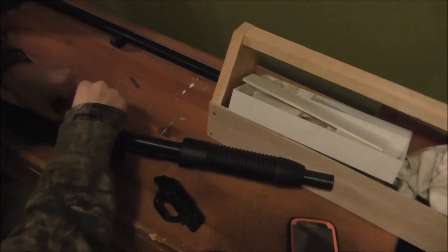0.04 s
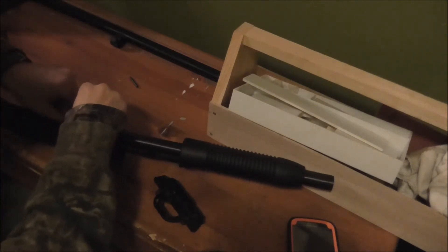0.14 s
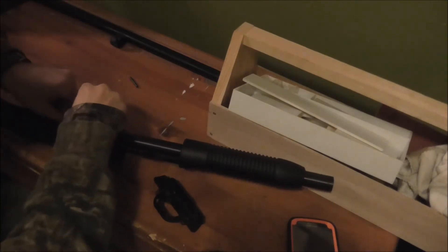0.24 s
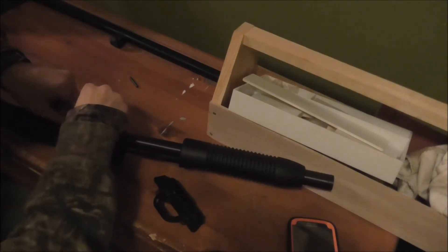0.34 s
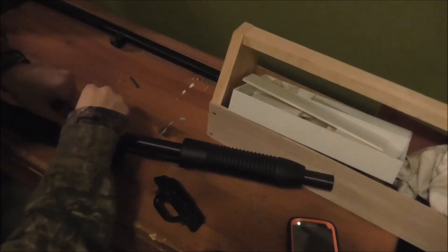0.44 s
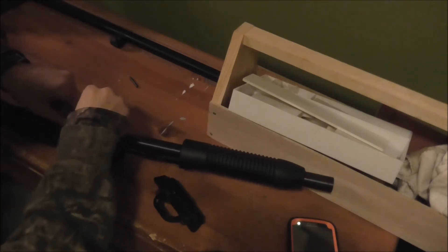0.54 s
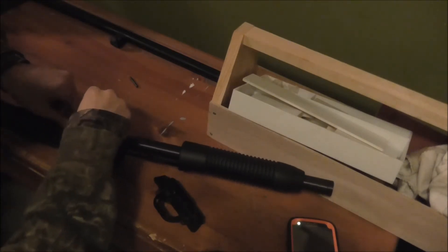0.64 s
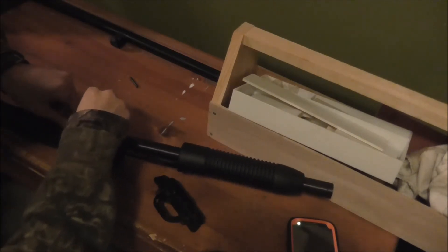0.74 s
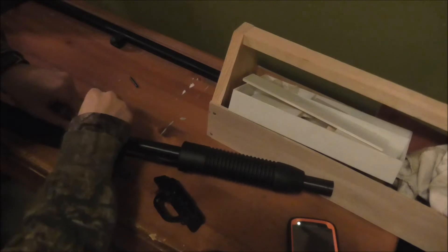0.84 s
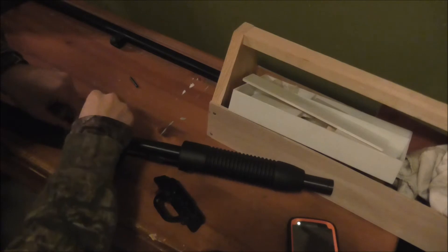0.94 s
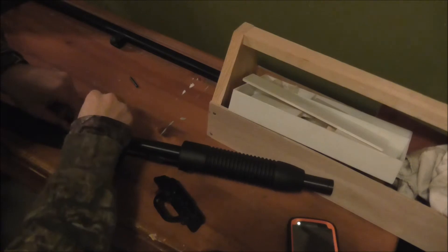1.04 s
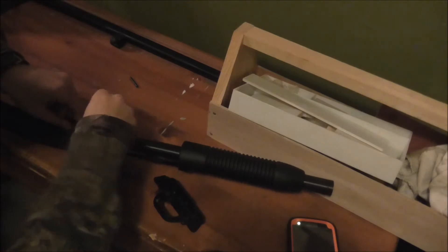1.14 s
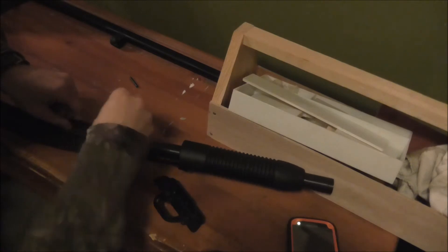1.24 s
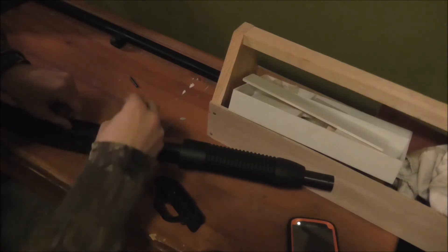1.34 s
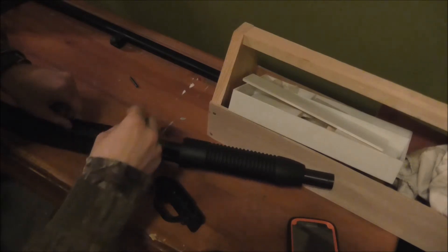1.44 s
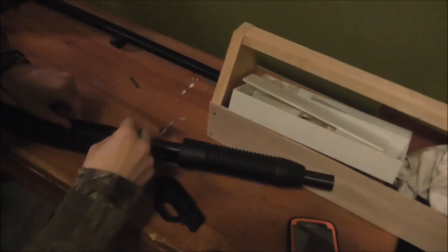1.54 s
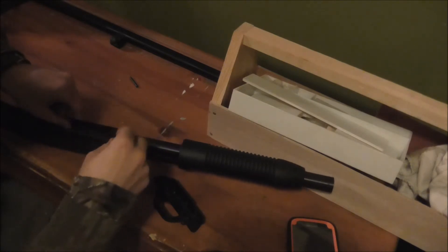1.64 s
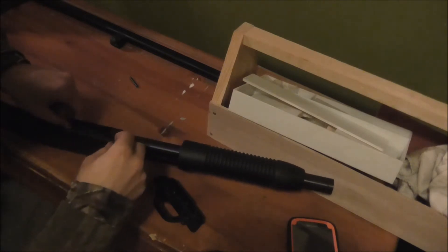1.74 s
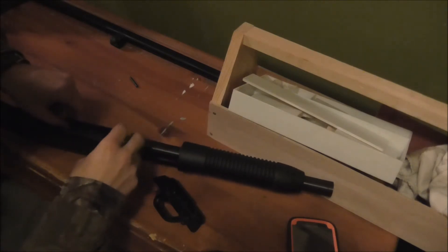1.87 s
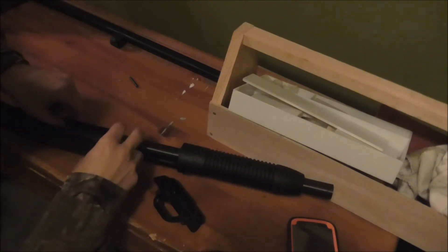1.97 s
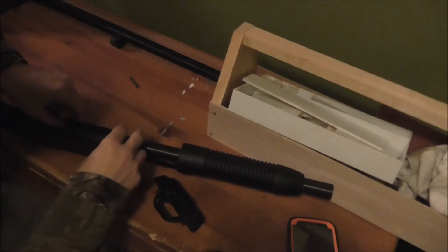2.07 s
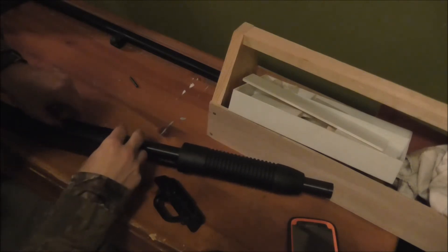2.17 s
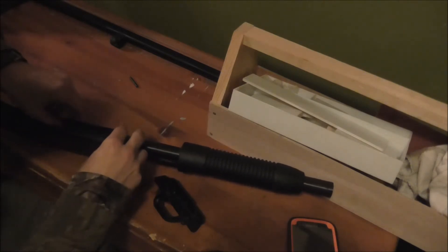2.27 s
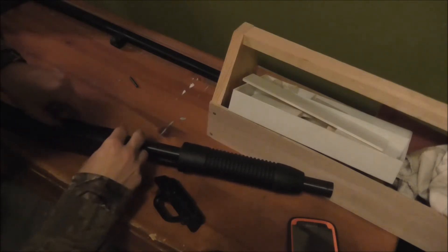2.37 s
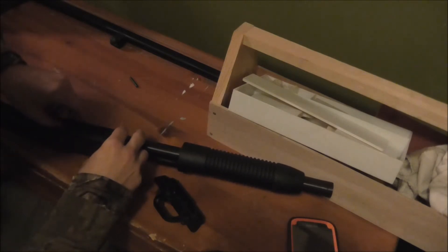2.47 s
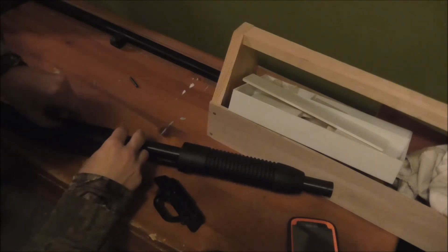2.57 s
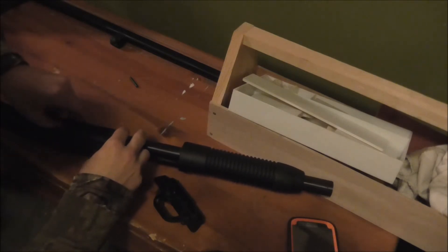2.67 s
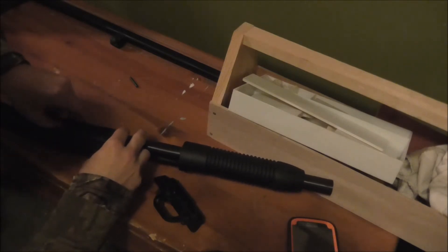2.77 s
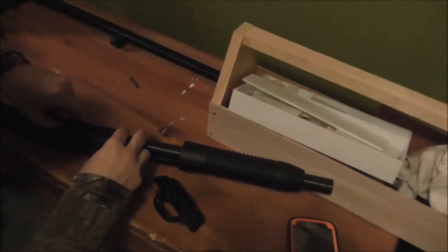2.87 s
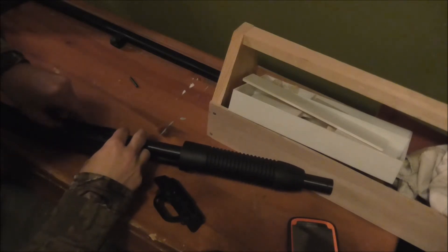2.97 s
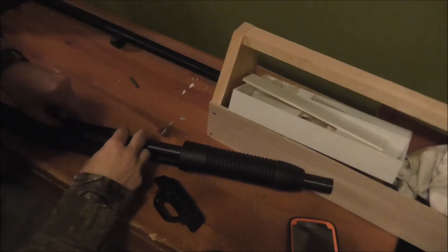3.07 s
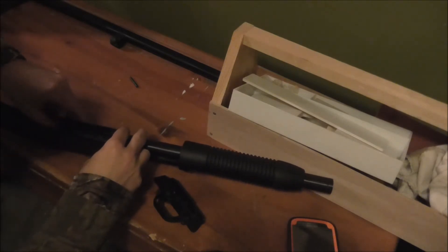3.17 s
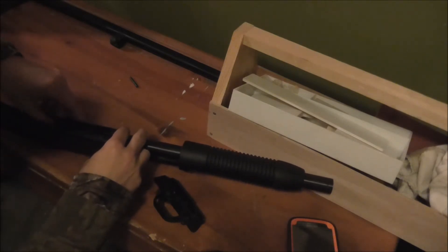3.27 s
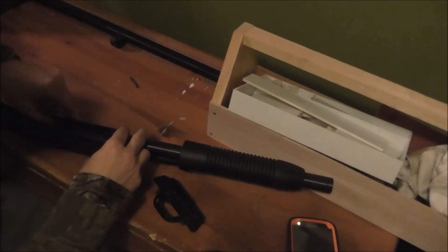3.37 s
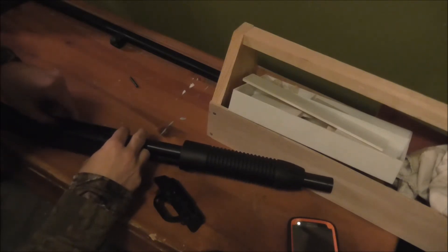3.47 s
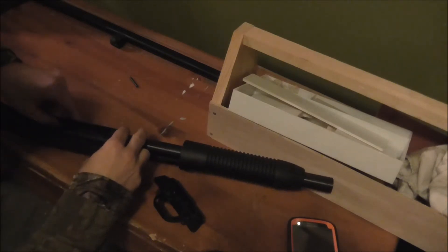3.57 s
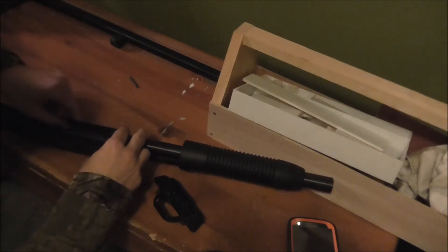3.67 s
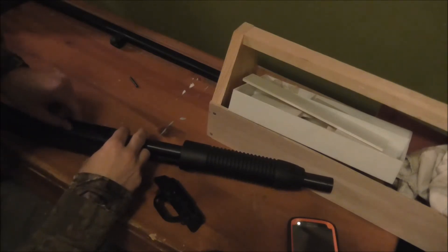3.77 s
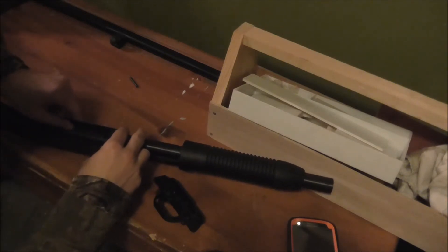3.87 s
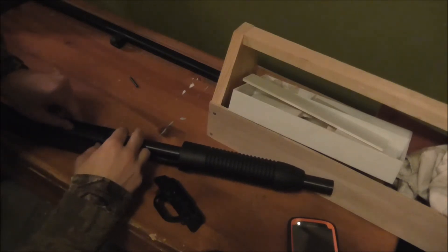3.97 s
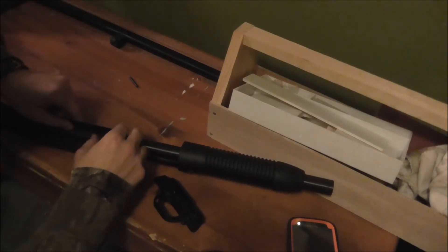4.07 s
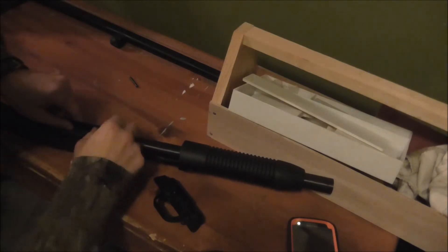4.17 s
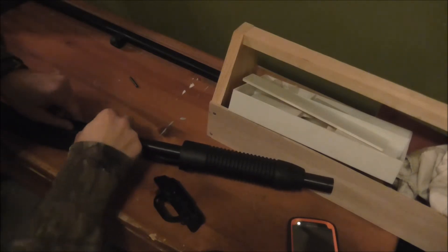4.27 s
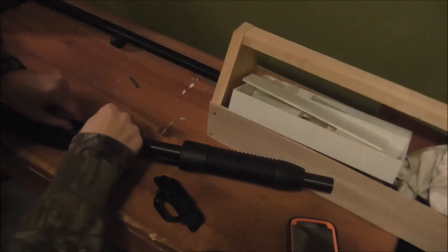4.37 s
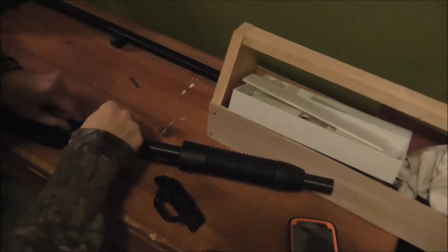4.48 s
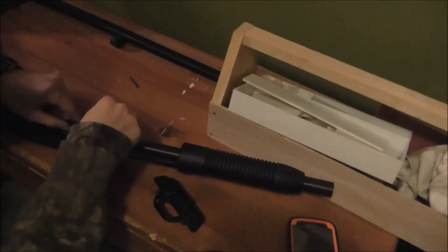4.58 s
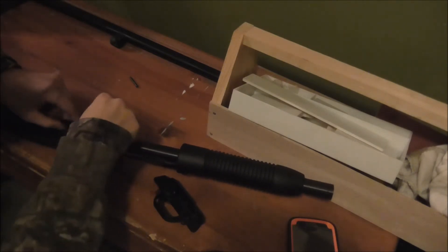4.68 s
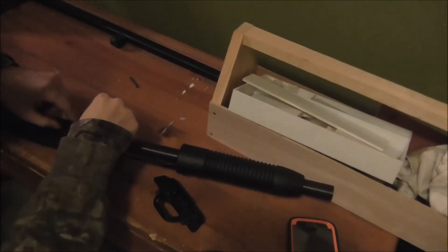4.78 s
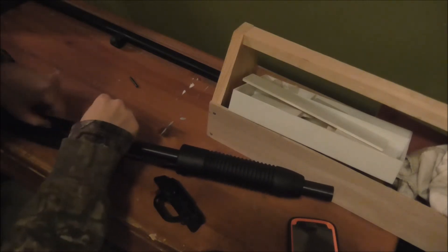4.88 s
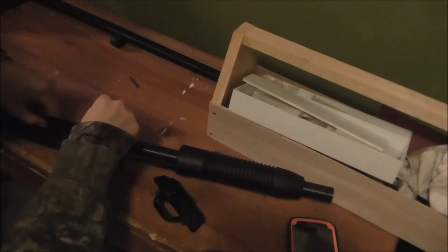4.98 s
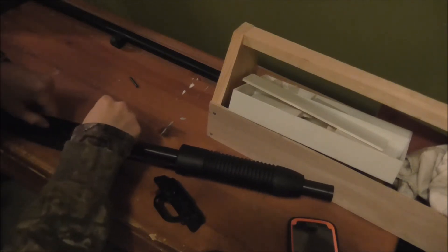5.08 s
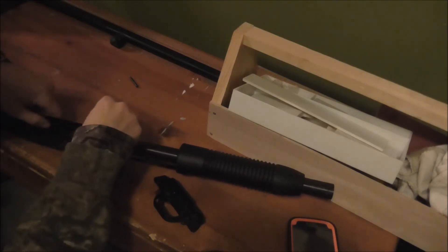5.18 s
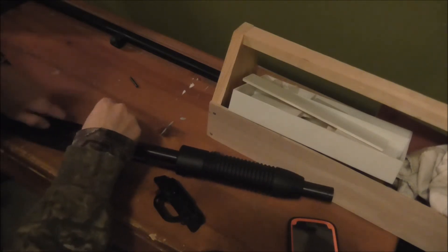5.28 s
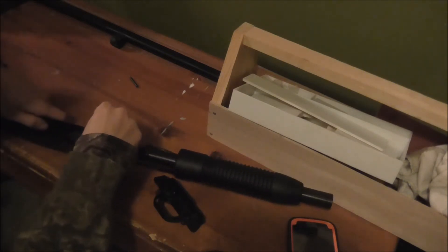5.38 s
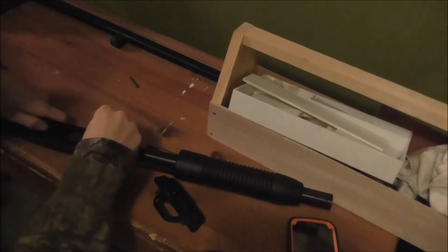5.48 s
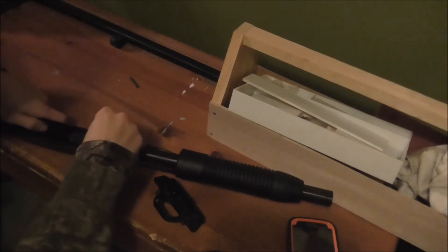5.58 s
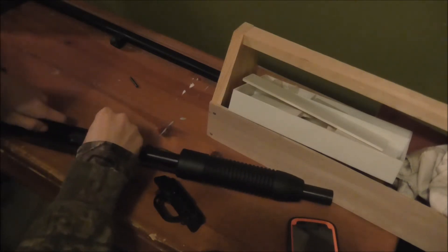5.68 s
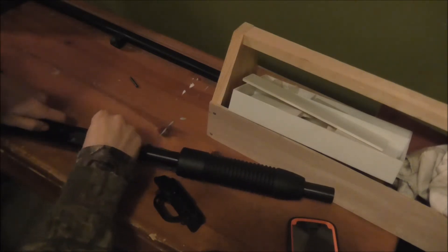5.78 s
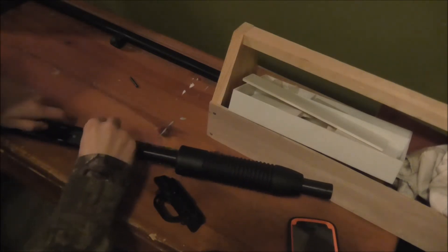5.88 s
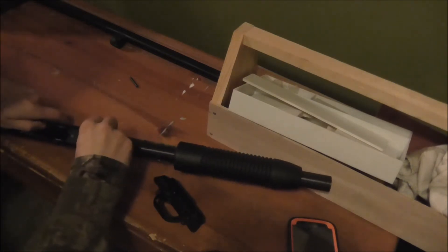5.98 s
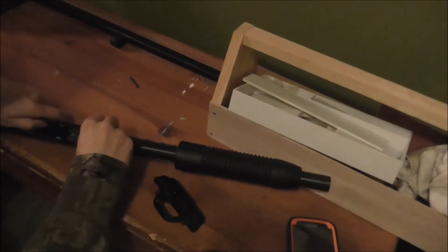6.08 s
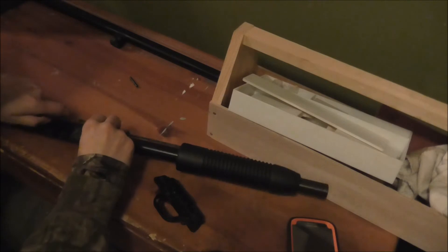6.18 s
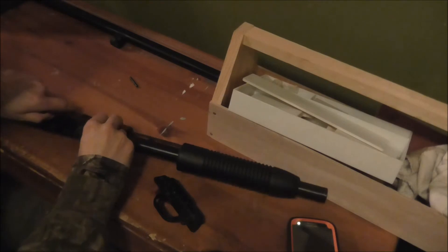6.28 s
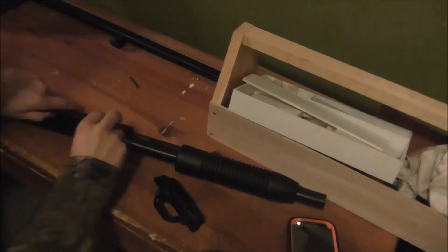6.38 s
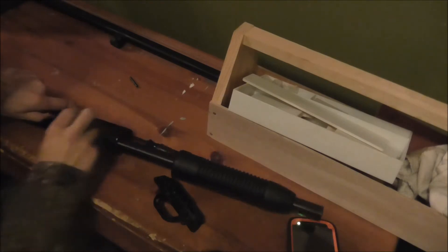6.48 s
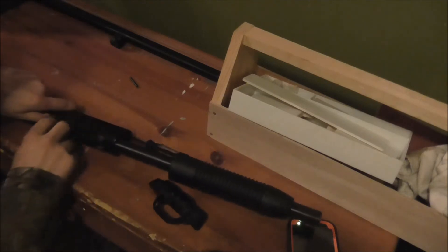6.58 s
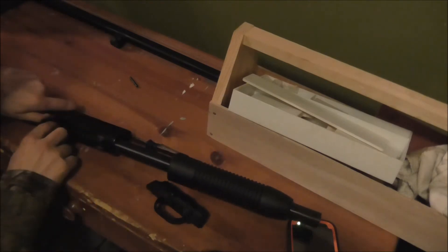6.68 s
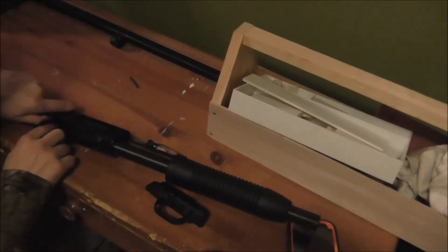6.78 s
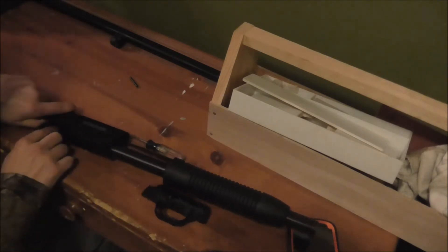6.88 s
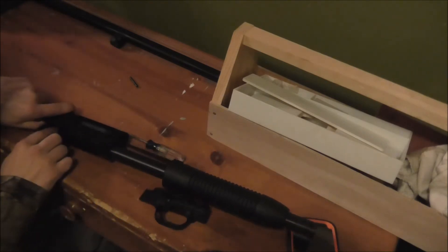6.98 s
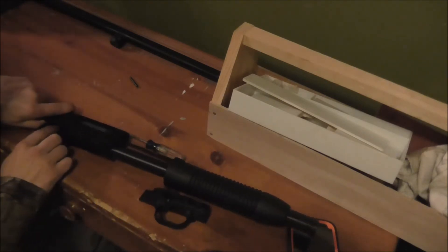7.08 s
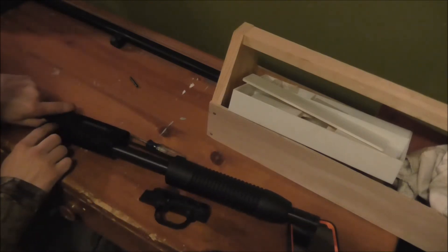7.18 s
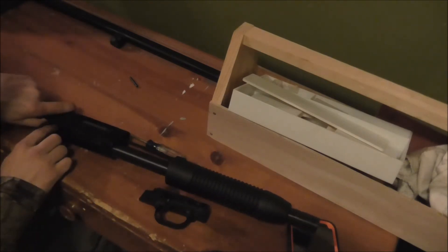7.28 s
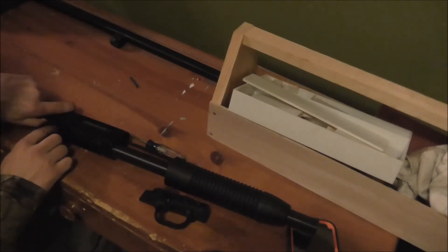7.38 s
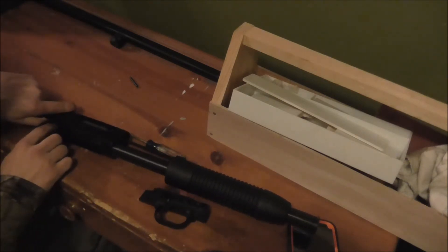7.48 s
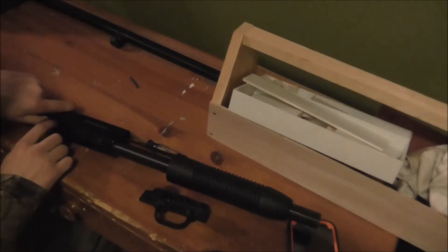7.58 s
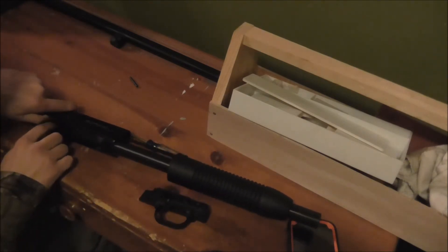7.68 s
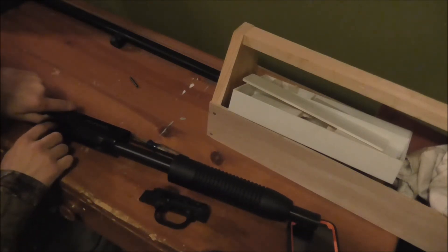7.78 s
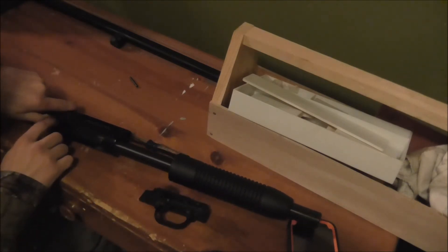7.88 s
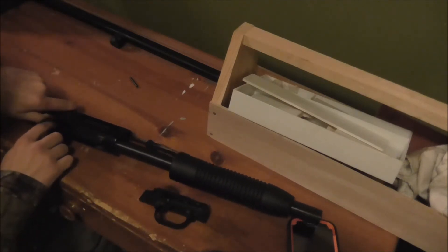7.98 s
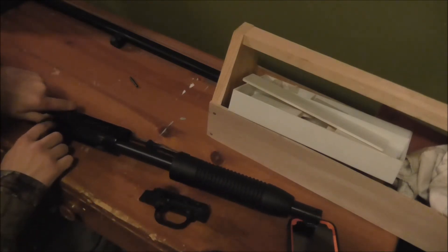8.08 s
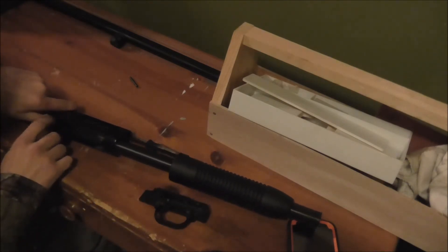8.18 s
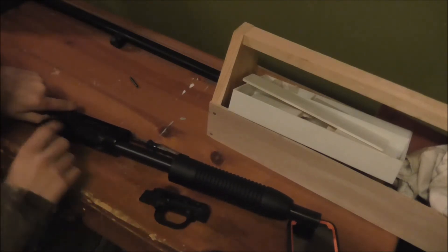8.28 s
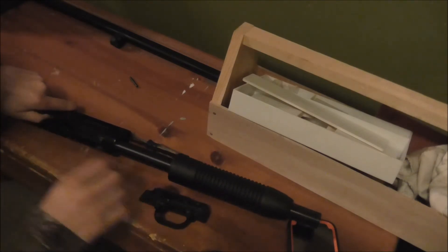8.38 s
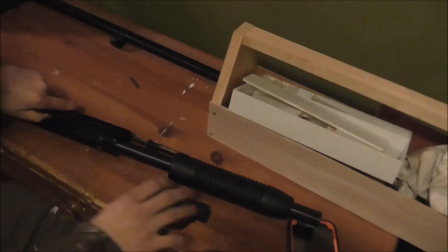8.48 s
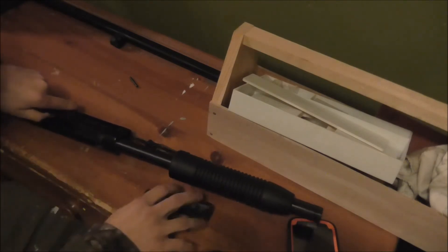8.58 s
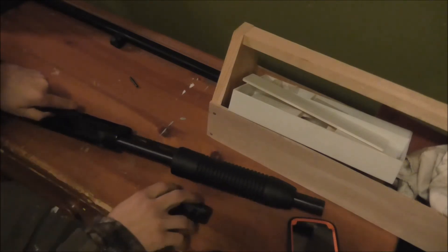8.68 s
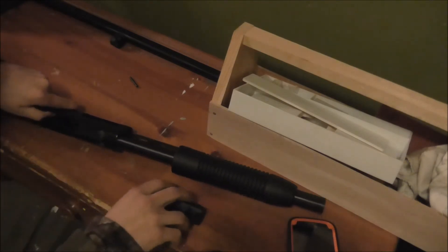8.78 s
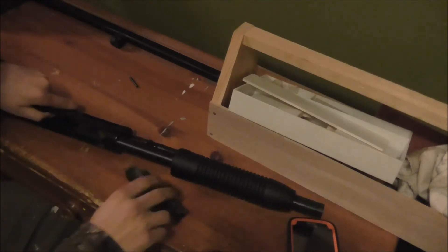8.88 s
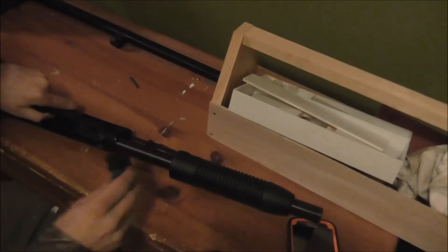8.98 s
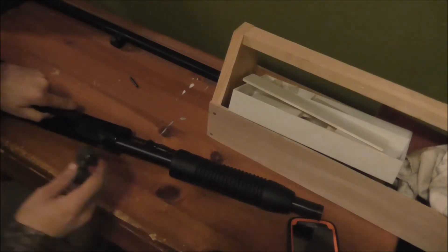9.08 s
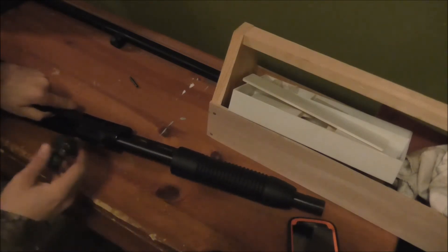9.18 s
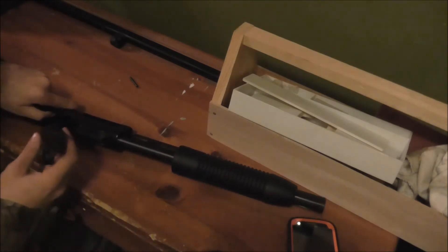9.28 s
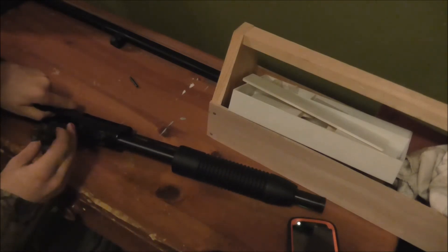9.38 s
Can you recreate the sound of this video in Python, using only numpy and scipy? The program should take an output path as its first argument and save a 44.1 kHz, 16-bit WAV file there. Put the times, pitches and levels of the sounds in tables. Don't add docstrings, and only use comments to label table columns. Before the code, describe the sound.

Close metallic clacks and dull wooden knocks from a long gun being assembled, then turned over in a clatter, over faint hum and hiss.

```python
import sys
import numpy as np
from scipy import signal
from scipy.fft import rfft, irfft
from scipy.io import wavfile
from scipy.ndimage import uniform_filter1d

SR = 44100
rng = np.random.default_rng(int(sys.argv[2]) if len(sys.argv) > 2 else 0)


def master(y):
    cut = np.clip(np.atleast_2d(y).T, -1, 1)
    pcm = np.round(cut * 32767)
    wavfile.write(sys.argv[1], SR, pcm.astype(np.int16))


def level_to_linear(level):
    exponent = np.asarray(level, float) / 20
    return 10 ** exponent


N = 415863

# f/Hz, level/dB [dB per Hz]
CLACK_TAIL = [(530, -41), (900, -32), (1400, 1.5), (1630, -0.5), (1880, -15), (2170, -12.5), (3340, -18.5),
              (3800, -13), (4660, -18.5), (5910, -6.5), (8340, -23), (10200, -16), (15500, -46)]
# f/Hz, level/dB [dB per Hz]
WASH = [(12, -65), (30, -20), (48, -3), (80, -20), (110, -8.5), (166, -13), (252, -5.5), (352, -13.5),
        (427, -11), (491, -11.5), (857, -14.5), (985, -18.5), (1580, -22), (2680, -31.5), (13100, -37.5),
        (15500, -39.5)]
# f/Hz, likeness [-1 to 1]
SIDE_LIKENESS = [(60, 0.072), (240, 0.84), (950, 0.24), (3770, 0.055), (15000, 0.46)]
# t/s, level/dB
HUM_LEVEL = [(0, -66), (.5, -60), (1.2, -58), (1.7, -54), (3.2, -55), (4.2, -59), (5.3, -56), (6, -58),
             (7.5, -58), (8.6, -58), (9.43, -57)]
# f/Hz, level/dB
HUM_TONES = [(63.5, 1.5), (127, -8), (133, -7), (200, -8), (260, -14), (437, -11)]

# f/Hz, level/dB, time to fall 60 dB [s]
STEEL_EARLY = [(1580, -20, 0.0093), (1560, 4.5, 0.019), (1920, -4, 0.0072), (2810, -16, 0.019),
               (3660, -1, 0.0057), (4560, -4.5, 0.0081), (5420, -7.5, 0.01), (6190, -9, 0.017),
               (7300, 1, 0.006), (9140, 4.5, 0.012), (10100, -3, 0.0045), (11550, -14, 0.0043)]
# f/Hz, level/dB, time to fall 60 dB [s]
STEEL_LATE = [(1693, 10.5, 0.023), (1811, 3, 0.065), (1496, 0, 0.022), (1292, -0.5, 0.018),
              (2360, -14, 0.025), (3170, -23, 0.047), (4070, -8, 0.0071), (4350, -5, 0.016),
              (5300, -10, 0.015), (6320, 1, 0.0043), (6980, -9, .012), (8920, 12.5, 0.044),
              (10140, 11.5, 0.0091), (11600, 11, 0.005)]
# f/Hz, level/dB, time to fall 60 dB [s]
STEEL_JOLT = [(1650, 1, 0.024), (1820, 4, 0.018), (2630, 13, 0.013), (4680, 7.5, 0.023), (5100, 5, 0.011),
              (5650, 13, 0.0085), (9600, 8, 0.0022), (11780, -12, 0.014)]
# from f/Hz, to f/Hz, time to fall 60 dB [s], level/dB re strong rings
FIZZ_FAMILIES = [
    (1210, 2440, 0.074, 1),
    (2600, 6400, 0.027, 1.5),
    (7900, 14600, 0.006, 2),
]
# t/s, middle level/dB, hollow level/dB re middle
TOUCHES_EARLY = [(0.2134, -65, 21.5), (0.2336, -51, 9.5), (0.3515, -42, 10), (0.4741, -45.5, 11),
                 (0.672, -53, 7), (0.6857, -48, 2), (0.707, -44, 1), (0.932, -55, 11), (0.952, -36, 3),
                 (0.969, -43, -5), (1.0, -44, 5), (1.54, -44, 2), (2.0562, -55, -5), (3.1825, -55.5, 14.5),
                 (3.2446, -38, 2), (3.5478, -46, 11), (3.8853, -43.5, 7), (4.4858, -49.5, 5),
                 (4.9987, -55, -12), (5.288, -52, -6), (5.3566, -53, -3), (5.4426, -48.5, 8),
                 (5.481, -33.5, 4)]
# t/s, middle level/dB, hollow level/dB re middle
TOUCHES_LATE = [(5.8806, -46, 5), (5.993, -49, 15), (6.009, -51, 13), (6.2403, -52, 13), (6.331, -34, 4),
                (6.0307, -51, -17), (6.5336, -43, 12), (6.6155, -33.5, 1), (6.7037, -46, -1),
                (7.0187, -31.5, 4), (7.0587, -36, 2), (7.1679, -57.5, 22), (7.606, -42, 4),
                (7.9579, -36, 7.5), (8.068, -24, 2), (8.25, -38, 10.5), (8.33, -30, -17),
                (8.6255, -40.5, 2.5), (8.72, -58, 6), (8.737, -46, -2), (8.9164, -57, 7),
                (8.9381, -35, -13), (8.9876, -35, 10)]
# t/s, middle level/dB, hollow level/dB re middle, edge level/dB re middle, strongest f/Hz
CLACKS_EARLY = [(0.719, -21.5, 1, -10, 3650), (0.9428, -34, -2, -7, 2860), (0.9614, -28, 0, -12, 5170),
                (0.976, -23.5, 1, -15, 2880), (0.9827, -13.5, -1, 3, 2750), (1.0643, -28.5, -2, 1, 5380),
                (1.0689, -18.5, -5.5, 2, 2730), (2.0981, -38.5, -4.5, -9, 4250),
                (3.256, -32, -4, -29, 3340), (3.2633, -31, -1, -2, 5000), (3.2803, -28, -6, -12, 2630),
                (3.377, -20, -4, -30, 4400), (3.382, -15.5, -6.5, -4.5, 4400), (3.7474, -32, 1, -10, 6000),
                (3.947, -13.5, -10, 6, 5100), (4.7011, -30.5, 1.5, -13, 2600)]
# t/s, middle level/dB, hollow level/dB re middle, edge level/dB re middle
CLACKS_LATE = [(6.002, -45.5, 10, 8.5), (6.288, -13, -10, -8.5), (6.3023, -16.5, -2, -5),
               (6.317, -20, 3.5, -13), (6.8157, -28.5, -1.5, -3), (6.823, -27, 2, -10),
               (6.8309, -29, 13, -15), (6.8364, -24.5, 8, -19), (6.906, -23, 3.5, -3),
               (7.22, -35.5, 0, -20), (7.233, -21, 0.5, 2.5), (7.243, -17.5, 0, -5),
               (7.3946, -28, 5.5, -34.5), (7.407, -21.5, 6.5, -19), (7.4187, -21, 3, -22),
               (7.427, -25.5, 3.5, -12), (7.503, -33.5, -27, -11), (7.623, -25, 7, 6.5),
               (7.635, -19, 4.5, -4.5), (7.7538, -19, 1, -15), (7.763, -10, -2.5, -10.5),
               (7.9809, -17.5, 2.5, 1.5), (7.991, -21.5, 2.5, -24), (8.0735, -29, -8, -5),
               (8.08, -10.5, -2.5, -9), (8.277, -17.5, -1, -3.5), (8.29, -19.5, 2, -3),
               (8.303, -28, 8, -30), (8.6456, -21, -4, -18), (8.656, -29, -5, -20)]
JOLT_RINGS = [5100, 4850, 4750, 2770]

# f/Hz, level/dB
TABLE = [(110, -1), (165, -21), (215, 0.5), (255, -2.5), (320, -0.5), (415, -6), (480, 1.5), (550, -0.5),
         (630, -7.5), (710, -12), (800, -14.5), (900, -3.5), (1120, -5.5), (1270, -4.5), (1480, -2)]
# f/Hz, level/dB
STILL_TABLE = [(150, -10), (235, -23), (315, 0.5), (385, -3), (425, -5.5), (505, 0.5), (548, 7),
               (610, -1.5), (690, -9), (770, -11.5), (835, 3), (1007, -17), (1136, 7), (1300, -12)]
# t/s, level/dB, upper modes level/dB re knock, strongest f/Hz
KNOCKS = [(0.237, -42, -22, 400), (0.981, -38.5, -5, 430), (3.383, -38.5, -5, 500), (2.109, -49, -0.5, 208),
          (3.255, -37, -9, 500), (3.862, -35.5, -25, 334), (3.87, -37, -23.5, 550), (3.9, -42, -20, 606),
          (3.911, -39, -21, 570), (4.491, -44.5, -33, 627), (5.36, -41.5, -6.5, 700), (5.427, -39, 6, 596),
          (5.481, -27, -5.5, 620), (5.495, -37.5, 2.5, 560), (6.1256, -49, 7.5, 424), (6.134, -49, 7, 500),
          (6.24, -39, -5, 600), (6.21, -33.5, -9, 500), (7.409, -41.5, 1, 494), (0.72, -50, 1, 706),
          (7.628, -51, -10, 700), (7.763, -43.5, 4, 690), (8.081, -42.5, -10, 730), (8.278, -41, -7, 702)]
# t/s, level/dB, upper modes level/dB re knock, strongest f/Hz
BUMPS = [(6.286, -14.5, -5, 418), (6.301, -11.5, -4.5, 478), (6.315, -22, -10, 330), (6.33, -17.5, -2, 507),
         (6.344, -23.5, -10, 260), (6.355, -30.5, 4, 520), (6.363, -20.5, -18, 514), (6.372, -24, -22, 250),
         (6.392, -29, -17, 218), (6.4, -27, -25, 111), (6.417, -24.5, -14, 252), (6.534, -13, -5, 505),
         (6.558, -19.5, -5, 523), (6.584, -19, -18, 540), (6.61, -14.5, -11.5, 544), (6.594, -24, -12, 325),
         (6.64, -23.5, -16, 332), (6.674, -23, -15.5, 307), (6.72, -31, -27, 320), (6.75, -27.5, -35, 325),
         (6.786, -24.5, -14, 224), (6.902, -17, -11, 490), (7.021, -15, -8.5, 358), (7.036, -30.5, -4, 300),
         (7.06, -30, -15, 428), (7.076, -24, -30, 250), (7.1, -30, -23, 260), (7.17, -19, -15.5, 485),
         (7.186, -21.5, -28, 340), (6.925, -27, -16, 300), (6.955, -30, -21, 420)]
# t/s, level/dB, upper modes level/dB re knock, strongest f/Hz
GRAB = [(8.628, -29.5, -8, 277), (8.655, -11.5, 1.5, 465), (8.664, -12, -12, 342.5), (8.679, -20, -18, 320),
        (8.72, -18.5, -6.5, 422), (8.745, -26, -8.5, 320), (8.765, -29, -16, 304), (8.807, -28, -27, 258),
        (8.836, -30.5, -13, 318), (8.864, -27.5, -14, 318), (8.914, -22.5, -18, 343),
        (8.948, -19.5, -4, 320), (8.964, -25.5, 3, 317), (8.975, -25.5, -3, 320), (8.985, -23.5, -1.5, 333),
        (9.008, -39, 3, 320)]
# t/s, level/dB, left-right level/dB
THUDS = [
    (0.349, -11.5, -1.5),
    (1.5365, -11, -2),
    (3.5431, -18.5, -1.5),
    (3.8234, -22, -1.5),
    (8.6463, -3, -1),
    (8.9391, -9.5, -1.5),
]
# f/Hz, level/dB, time to fall 60 dB [s]
SPOT_FAR = [(318, -14, 0.1), (408, -6, 0.053), (478, -7, 0.036), (562.5, 3, 0.062), (604, -4.5, 0.047),
            (836, -11, 0.075), (905, -11, 0.06), (1310, -13.5, 0.044), (2000, -16.5, 0.023)]
# f/Hz, level/dB, time to fall 60 dB [s]
SPOT_EDGE = [(250, -17, .05), (320, -15.5, 0.15), (420, 3.5, 0.048), (520, 9.5, 0.037), (642, 4, 0.046),
             (684, 5, 0.041), (765, -5, 0.064), (898, 2, 0.055), (965, -5.5, 0.056), (1160, -9.5, 0.04),
             (1914, -19, 0.039)]
# f/Hz, level/dB, time to fall 60 dB [s]
SPOT_NEAR = [(235, -17, 0.054), (314, -9, 0.21), (385, -2.5, 0.1), (505, -15, 0.034), (554, 3.5, 0.075),
             (620, -2.5, 0.072), (700, -12, 0.098), (822, -11.5, 0.082), (1200, -16, 0.046),
             (1560, -33, 0.033)]
# f/Hz, level/dB, time to fall 60 dB [s]
SPOT_NEAR_AGAIN = [(234, -22, 0.039), (318, -6, 0.089), (382, -1.5, .08), (505, -16, 0.038),
                   (550, 3.5, 0.06), (620, -8, .06), (810, -14.5, 0.085), (1310, -22, 0.038)]
# f/Hz, level/dB, time to fall 60 dB [s]
SPOT_GRAB = [(201, -7, 0.036), (276, -15, 0.12), (323, -6.5, 0.11), (425, -4, 0.058), (468, 3, 0.054),
             (512, -0.5, 0.067), (630, -1, 0.079), (700, -2, .06), (775, 1.5, 0.077), (920, -9, 0.045),
             (974, 0.5, 0.043), (1107, 8.5, 0.029), (1303, -9, 0.044), (1710, -13, 0.032)]
# t/s, rumble level/dB
DRAGS = [
    [(5.35, -94.5), (5.456, -46), (5.6, -66)],
    [(5.72, -68), (5.93, -46), (6.09, -57), (6.17, -60), (6.29, -40)],
    [(6.288, -25), (6.38, -31), (6.44, -53), (6.474, -57), (6.53, -68)],
    [(6.53, -34), (6.6, -28), (6.66, -36), (6.7, -38), (6.74, -45), (6.8, -37.5), (6.85, -51), (6.9, -55)],
    [(6.9, -42), (6.96, -46), (7.01, -46), (7.04, -31), (7.1, -39), (7.16, -48), (7.19, -38), (7.27, -50)],
    [(7.39, -47), (7.44, -42.5), (7.49, -60)],
    [(8.64, -26), (8.688, -28), (8.76, -32), (8.81, -40.5), (8.87, -37.5), (8.925, -47), (8.96, -29),
     (9.02, -42.5), (9.12, -57)],
]
# f/Hz, slope [dB per octave]
DRAG_PITCH = [(393, 6), (320, 3), (300, 24), (320, 13), (260, 13), (260, 13), (318, 6)]
# f/Hz, level/dB [dB per Hz]
RUSTLE = [(710, -3.5), (1200, -10), (1350, -10), (1760, -8.5), (2680, -27), (5100, -12), (8040, -30),
          (15000, -34)]
# middle t/s, half length t/s, level/dB
SWEEPS = [
    (5.484, 0.049, -54),
    (5.95, 0.11, -46.5),
    (6.306, 0.11, -47),
    (6.594, 0.1, -54.5),
    (6.9, 0.75, -59),
    (8.872, 0.22, -54.5),
    (8.947, 0.044, -41.5),
]

# f/Hz, time to fall 60 dB [s]
ROOM = [(250, 0.19), (1000, 0.26), (4000, 0.22), (9000, 0.18), (15000, 0.11)]
# f/Hz, left lead [units of 1.6 rad]
PORTS_PHASE = [(0, 0), (340, -0.3), (1120, 0.2), (4740, -0.0), (6630, 0.2), (7320, -0.1), (8960, 0.5),
               (11000, 0.6), (11500, -0.0), (12600, 0.9), (14500, -0.0), (16100, -0.0)]
# f/Hz, left-right level/dB
PORTS_LEVEL = [(60, 3), (130, 4), (290, 0), (640, -1.5), (1410, 1.5), (3100, 3.5), (6820, 2.5), (15000, -2)]


def evened(x):
    return x / np.sqrt(np.mean(x ** 2) + 1e-20)


def peaked(x):
    return x / np.sqrt(uniform_filter1d(x ** 2, size=200).max() + 1e-20)


def read(points, hz):
    f, value = np.transpose(points)
    return np.interp(np.log(hz + 1), np.log(f + 1), value)


def add(mix, s, sound, pan_db):
    part = mix[:, max(round(s * SR), 0):][:, :len(sound)]
    sides = level_to_linear(np.array([[pan_db / 2], [-pan_db / 2]]))
    part += sides * sound[:part.shape[1]]


def coloured(points, count):
    spectrum = rfft(rng.standard_normal(count))
    return evened(irfft(spectrum * level_to_linear(read(points, np.fft.rfftfreq(count, 1 / SR))), count))


def ring(hz, db, t60, contact, seconds, scatter=1, rise=1e-4):
    t = np.arange(round(seconds * SR))[:, None] / SR
    fade = level_to_linear(db - 60 * t / np.maximum(t60, .003))
    modes = fade * np.sin(2 * np.pi * (hz * t + scatter * rng.random(len(hz))))
    start = (1 - np.exp(-t[:, 0] / rise)) ** 2
    end = np.cos(np.pi / 2 * t[:, 0] / seconds)
    return peaked(signal.fftconvolve(modes.sum(1) * start * end, contact))


def clack_tail():
    t = np.arange(round(.3 * SR)) / SR
    fade = level_to_linear(-33.0 - 60 * t / 0.042) + level_to_linear(-33.5 - 60 * t / 0.28)
    common, left, right = (coloured(CLACK_TAIL, count=len(t)) for _ in range(3))
    tail = fade * (common + 0.79 * np.array([left, right]))
    return np.pad(tail, ((0, 0), (0, N - len(t))))


def wash():
    level_db, hiss_edge_hz = -53, 15900
    hz = np.fft.rfftfreq(N, 1 / SR)
    a, b = rfft(rng.standard_normal((2, N)), axis=1)
    same = np.clip(read(SIDE_LIKENESS, hz), -1, 1)
    sides = np.array([a, same * a + np.sqrt(1 - same ** 2) * b])
    spectrum = sides * level_to_linear(read(WASH, hz)) * (hz < hiss_edge_hz)
    return level_to_linear(level_db) * evened(irfft(spectrum, N, axis=1))


def hum():
    t = np.arange(N) / SR
    s, db = np.transpose(HUM_LEVEL)
    drift = 1 + 0.00716 * sum(np.sin(2 * np.pi * (f * t + rng.random())) for f in (.13, .37, .9))
    turns = np.cumsum(drift) / SR
    tones = sum(level_to_linear(tone_db) * np.sin(2 * np.pi * (hz * turns + rng.random()))
                for hz, tone_db in HUM_TONES)
    return np.sqrt(2) * level_to_linear(np.interp(t, s, db)) * tones


def touches(rows):
    edges_db, edges_slope, ring_hz = -60, .6, 3550
    spread = rng.uniform(.75, 1.4, len(rows))
    return [(s, db, hollow_db, edges_db - db + edges_slope * (db + 46.5), ring_hz * k)
            for (s, db, hollow_db), k in zip(rows, spread)]


def clicks(rows, steel, fill_db, top_db):
    contact_s, harder_shorter = .0019, 0.35
    lead_s, lead_db = .002, -27.5
    strike_s = .008
    out = np.zeros((2, N))
    hz, db, t60 = np.transpose(steel)
    t = np.arange(2400) / SR
    bands = [signal.butter(2, f[:2], "bandpass", fs=SR, output="sos") for f in FIZZ_FAMILIES]
    for s, mid_db, hollow_db, edge_db, top_hz in rows:
        span = contact_s * level_to_linear(-harder_shorter * max(mid_db + 24.5, 0))
        late = np.maximum(t - strike_s, 0)
        strike = (late / span) * np.exp(-1.5 * late / span) * .6
        rub = level_to_linear(lead_db - 17) * np.exp(-abs(t - strike_s) / lead_s)
        force = strike + rub
        spot_db = db + 3 * rng.standard_normal(len(hz))
        tune = hz * (1 + 0.011 * rng.standard_normal(len(hz)))
        named = np.array([np.append(tune, top_hz), np.append(spot_db, top_db), np.append(t60, .006)])
        sound = 0
        levels_db = (hollow_db, 0, edge_db)
        for (lo_hz, hi_hz, fizz_t60, fizz_db), band, level_db in zip(FIZZ_FAMILIES, bands, levels_db):
            family = named[:, (named[0] >= lo_hz) & (named[0] < hi_hz)]
            chatter = force * rng.standard_normal(len(t))
            waves = np.exp(2j * np.pi * t[:800, None] * family[0])
            reach = abs(chatter[:800] @ waves) / np.linalg.norm(chatter)
            even_db = family[1] - 20 * np.log10(np.maximum(reach, .25))
            strong = ring(family[0], even_db, family[2], chatter, seconds=.05)[:len(t)]
            fade = np.sqrt(abs(signal.lfilter([1], [1, -level_to_linear(-120 / (fizz_t60 * SR))], force ** 2)))
            fizz = peaked(fade * rng.standard_normal(len(t)))
            both = strong + level_to_linear(fizz_db + fill_db) * fizz
            sound = sound + level_to_linear(level_db) * peaked(signal.sosfilt(band, both))
        add(out, s - strike_s - 0.27 * span, level_to_linear(mid_db - 9.5) * sound, 0)
    return out


def dying_noise(count, t60, lo_hz, hi_hz):
    band = signal.butter(2, [lo_hz, hi_hz], "bandpass", fs=SR, output="sos")
    fade = level_to_linear(-60 * np.arange(count) / (t60 * SR))
    return peaked(signal.sosfilt(band, fade * rng.standard_normal(count)))


def knocks(rows, t60, pan_db, bass_db, upper_hz, table, rise):
    struck_db = 4
    upper_slope_db = 10
    thud_db, thud_t60 = -12, 0.05
    crack_db, crack_t60 = -11, 0.023
    out = np.zeros((2, N))
    hz, db = np.transpose(table)
    t = np.arange(700) / SR
    low = hz < 750
    for s, level_db, hard_db, top_hz in rows:
        blow = .06 * rng.standard_normal(700) * np.exp(-(t / .007) ** 2)
        blow[0] = 1
        blow = np.convolve(blow, np.hanning(38))
        octaves = np.log2(hz / top_hz)
        slope_db = bass_db * np.minimum(octaves, 0) - 3 * np.maximum(octaves, 0)
        spot_db = db + slope_db + rng.standard_normal(len(hz))
        tune = hz * (1 + 0.014 * rng.standard_normal(len(hz)))
        low_hz, low_db = np.append(tune[low], top_hz), np.append(spot_db[low], struck_db)
        sound = ring(low_hz, low_db, t60, blow, seconds=.1, scatter=.15, rise=rise)
        upper_db = (spot_db - upper_slope_db * abs(np.log2(hz / upper_hz)))[~low]
        upper = ring(tune[~low], upper_db, 0.38 * t60, blow, seconds=.1, scatter=0.59, rise=0.5 * rise)
        sound += level_to_linear(hard_db + 1.0) * upper
        sound += level_to_linear(thud_db) * dying_noise(len(sound), thud_t60, 0.61 * top_hz, 1.57 * top_hz)
        crack = dying_noise(len(sound), crack_t60, 0.47 * upper_hz, 1.3 * upper_hz)
        sound += level_to_linear(hard_db + crack_db) * crack
        add(out, s, level_to_linear(level_db - 3.5) * sound, pan_db)
    return out


def thuds():
    out = np.zeros((2, N))
    spots = (SPOT_FAR, SPOT_EDGE, SPOT_NEAR, SPOT_NEAR_AGAIN, SPOT_GRAB, SPOT_GRAB)
    rises = (.00099, .00099, .00099, .00099, .0003, .0003)
    for (s, level_db, pan_db), spot, rise in zip(THUDS, spots, rises):
        hz, db, t60 = np.transpose(spot)
        sound = ring(hz, db, t60, np.hanning(16), seconds=.15, scatter=0, rise=rise)
        add(out, s, level_to_linear(level_db - 4) * sound, pan_db)
    return out


def drags():
    out = np.zeros((2, N))
    hz, db = np.transpose(TABLE)
    for rows, (top_hz, slope_db) in zip(DRAGS, DRAG_PITCH):
        s, rumble_db = np.transpose(rows)
        t = np.arange(s[0], s[-1], 1 / SR)
        slips = rng.standard_normal(len(t)) * level_to_linear(2.2 * rng.exponential(1, len(t)))
        slips = slips * (rng.random(len(t)) < 2200 / SR)
        slips = np.convolve(slips, np.hanning(40), "same")
        drag_db = db - slope_db * abs(np.log2(hz / top_hz))
        rumble = evened(ring(hz, drag_db, 0.12, slips, seconds=.1)[:len(t)])
        pressure = level_to_linear(np.interp(t, s, rumble_db)) * signal.windows.tukey(len(t), .06)
        add(out, s[0], pressure * rumble, -.8)
    return out


def rustle():
    fall_db = -7.5
    t = np.arange(N) / SR
    grain = level_to_linear(3.5 * evened(uniform_filter1d(rng.standard_normal(N), size=500)))
    swell = sum(level_to_linear(db + fall_db * ((t - s) / half) ** 2) for s, half, db in SWEEPS)
    return np.tile(swell * evened(grain * coloured(RUSTLE, count=N)), (2, 1))


def room(x):
    length = SR // 3
    taps = np.zeros((6, length))
    at = np.arange(130, length - 20, 20) + rng.integers(0, 20, (6, (length - 131) // 20))
    np.put_along_axis(taps, at, rng.choice([-1., 1.], at.shape), 1)
    taps[:] += 1.5 * np.repeat(taps[::2], 2, axis=0)
    hz, t, z = signal.stft(taps, SR, nperseg=256)
    tails = signal.istft(z * level_to_linear(-60 * t / read(ROOM, hz)[:, None]), SR, nperseg=256)[1]
    tails /= np.linalg.norm(tails, axis=1, keepdims=True)
    turn = 2 * np.pi * (3.1 * np.arange(N) / SR + np.arange(3)[:, None] / 3)
    shares = np.sqrt(2 / 3) * np.cos(turn) * x.mean(0)
    return sum(signal.oaconvolve(shares[k][None], tails[2 * k:2 * k + 2], axes=1)[:, :N]
               for k in range(3))


def ports(x):
    hz = np.fft.rfftfreq(N, 1 / SR)
    half = level_to_linear(read(PORTS_LEVEL, hz) / 2) * np.exp(.8j * read(PORTS_PHASE, hz))
    bass_cut = signal.butter(3, 125, "highpass", fs=SR, output="sos")
    carried = signal.sosfilt(bass_cut, x)
    top_cut = 1 / np.sqrt(1 + (hz / 14600) ** 20)
    return irfft(rfft(carried, axis=1) * np.array([half, 1 / half]) * top_cut, N, axis=1)


def scene():
    jolts = [row + (hz,) for row, hz in zip(CLACKS_LATE[:4], JOLT_RINGS)]
    late = [row + (4480 * rng.uniform(0.94, 1.04),) for row in CLACKS_LATE[4:]]
    steel = clicks(CLACKS_EARLY + touches(TOUCHES_EARLY), STEEL_EARLY, fill_db=5, top_db=-1)
    steel = steel + clicks(late + touches(TOUCHES_LATE), STEEL_LATE, fill_db=2, top_db=6.5)
    steel = steel + clicks(jolts, STEEL_JOLT, fill_db=-5, top_db=6.5)
    wood = knocks(KNOCKS, t60=.055, pan_db=0, bass_db=-5, upper_hz=850, table=STILL_TABLE, rise=.0011)
    wood = wood + drags() + rustle()
    wood = wood + knocks(BUMPS, t60=0.082, pan_db=-1.3, bass_db=5.5, upper_hz=997, table=TABLE, rise=.0005)
    wood = wood + knocks(GRAB, t60=0.082, pan_db=-1.3, bass_db=15, upper_hz=1160, table=TABLE, rise=.0005)
    firm = thuds()
    echoes = room(level_to_linear(-10.5) * steel + level_to_linear(-7.0) * wood + level_to_linear(-9.5) * firm)
    return ports(steel + wood + firm + echoes) + clack_tail() + wash() + hum()


def band_limit(x):
    return signal.sosfilt(signal.butter(12, 16520, fs=SR, output="sos"), x)


def record(dry):
    edge = signal.firwin(255, 16250, window=("kaiser", 9), fs=SR)[None]
    rounded = 1.174 * np.tanh(dry / 1.236)
    mix = signal.oaconvolve(rounded, edge, "same", axes=1)
    return band_limit(mix)


dry = scene()
out = record(dry)
master(out)
```